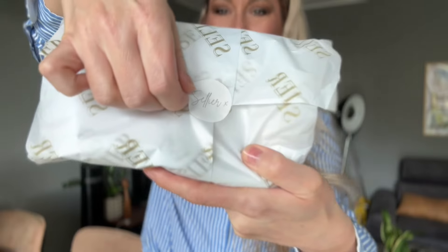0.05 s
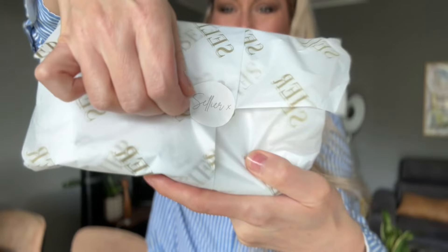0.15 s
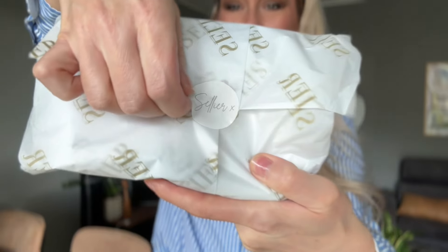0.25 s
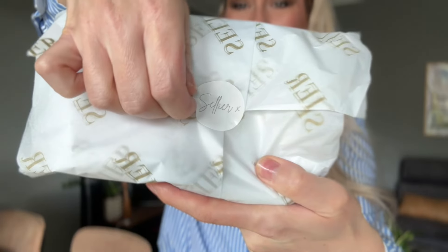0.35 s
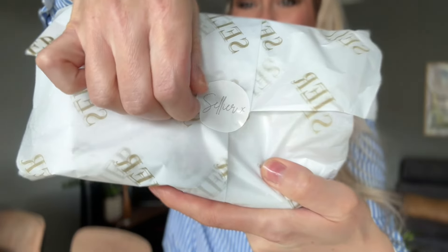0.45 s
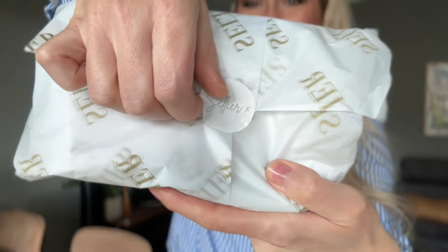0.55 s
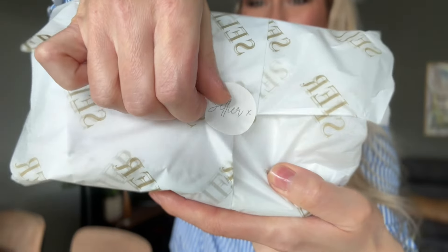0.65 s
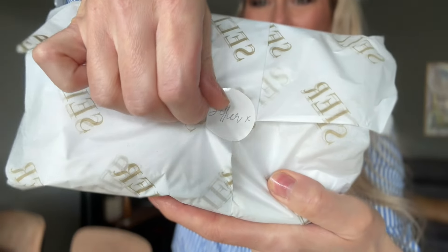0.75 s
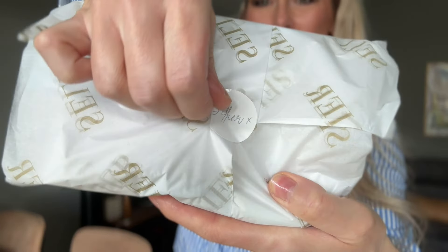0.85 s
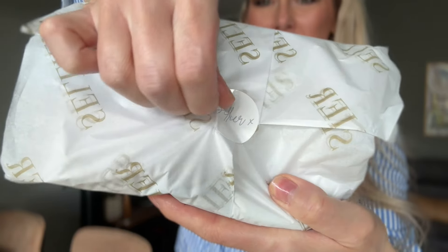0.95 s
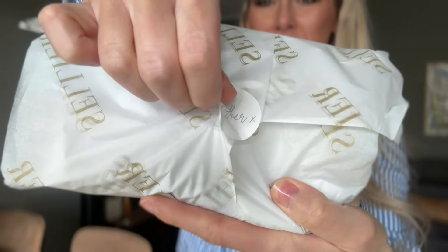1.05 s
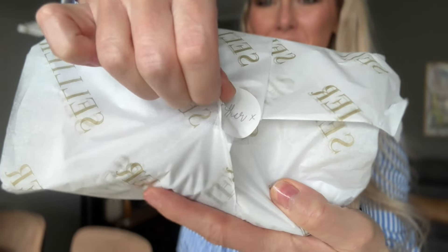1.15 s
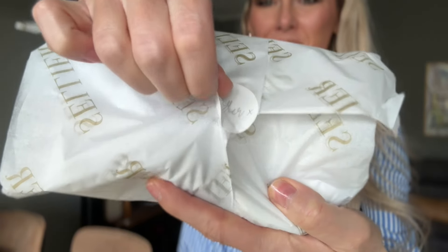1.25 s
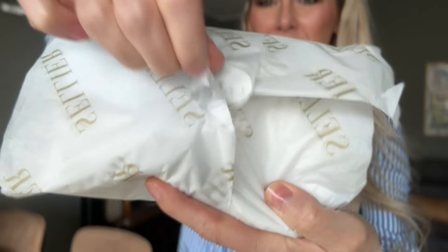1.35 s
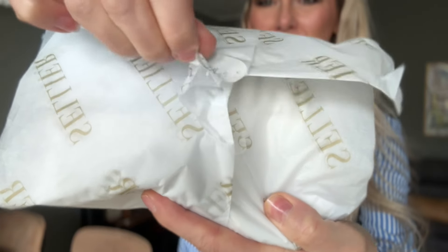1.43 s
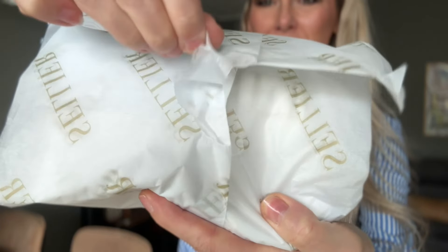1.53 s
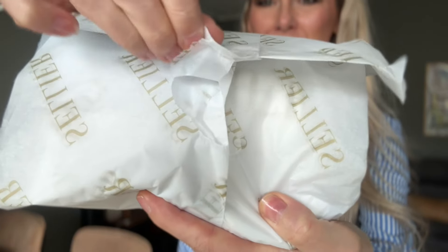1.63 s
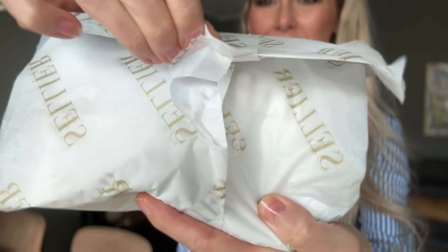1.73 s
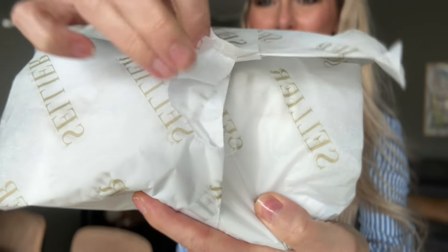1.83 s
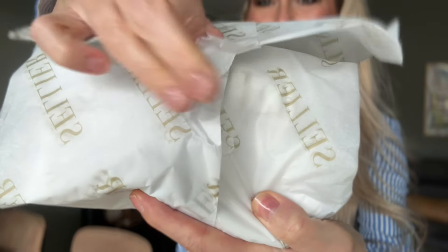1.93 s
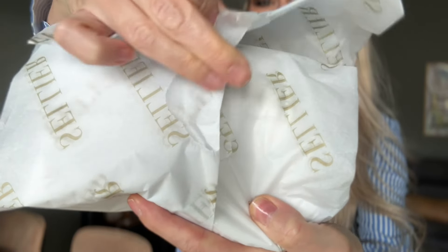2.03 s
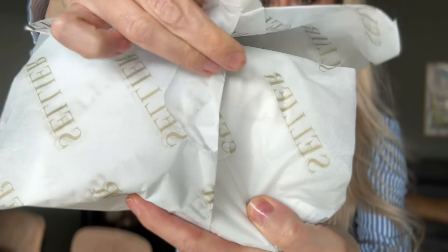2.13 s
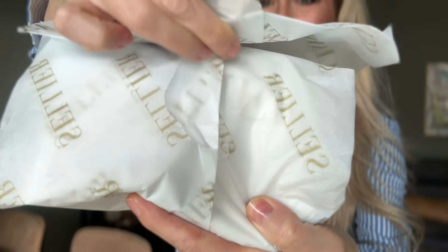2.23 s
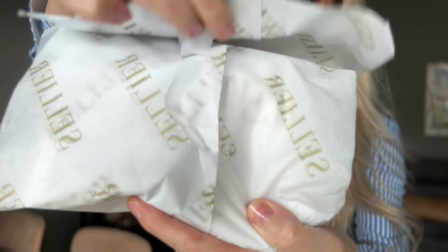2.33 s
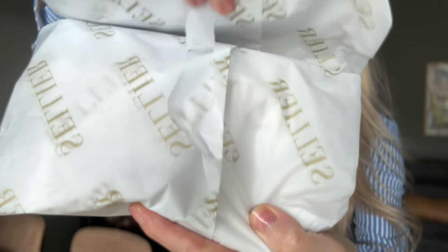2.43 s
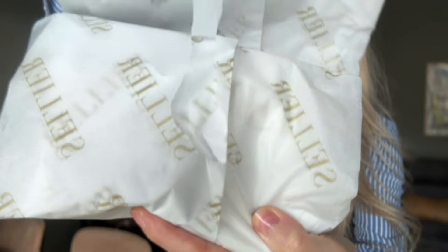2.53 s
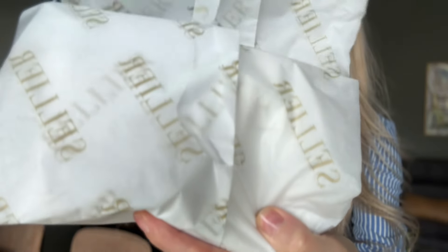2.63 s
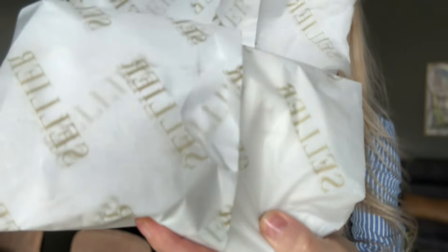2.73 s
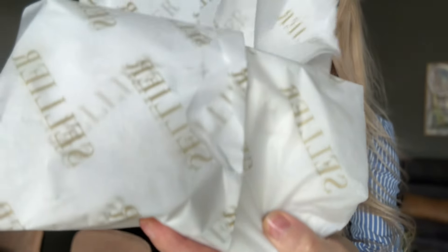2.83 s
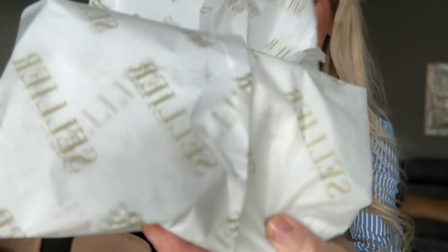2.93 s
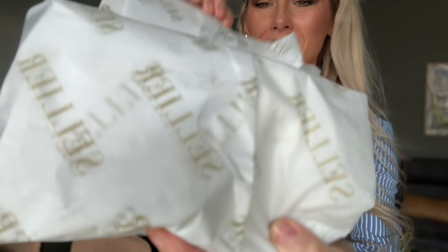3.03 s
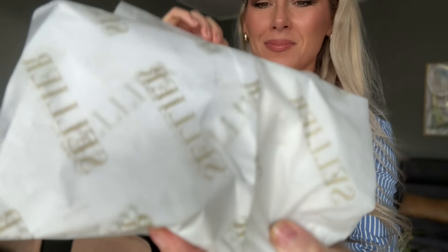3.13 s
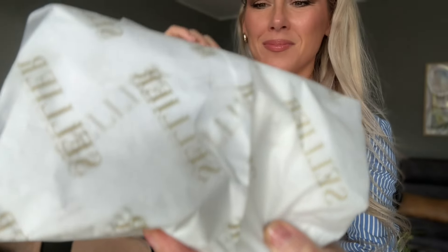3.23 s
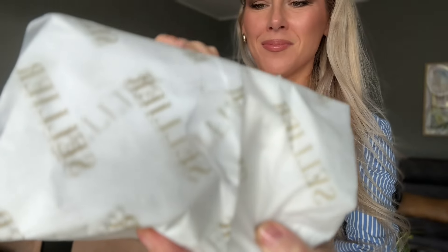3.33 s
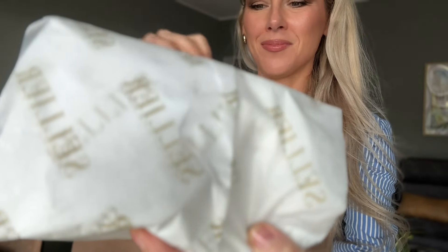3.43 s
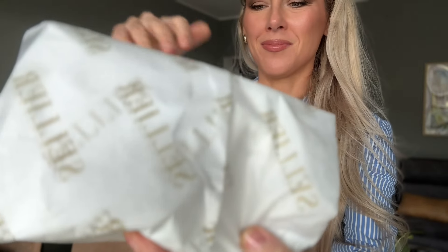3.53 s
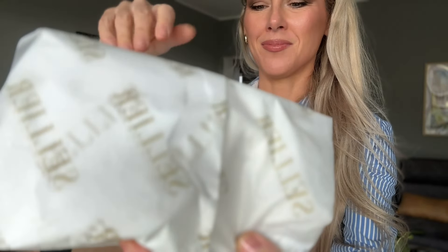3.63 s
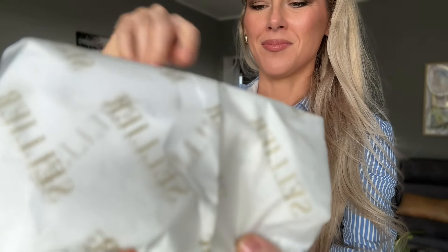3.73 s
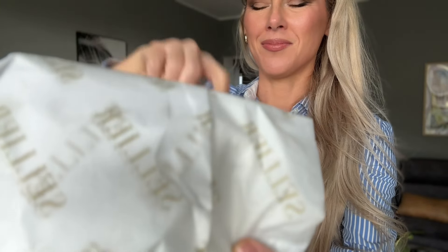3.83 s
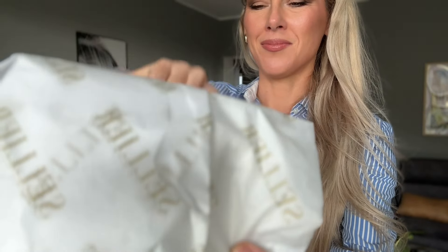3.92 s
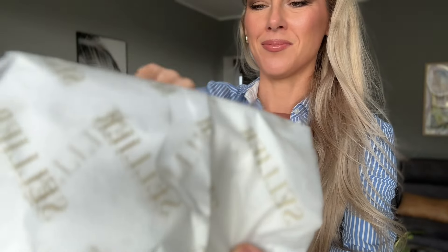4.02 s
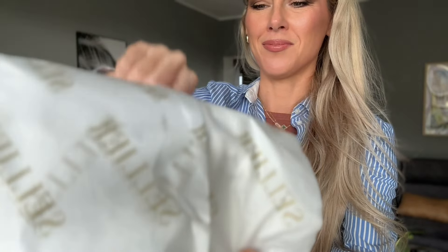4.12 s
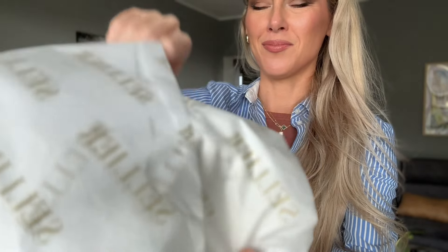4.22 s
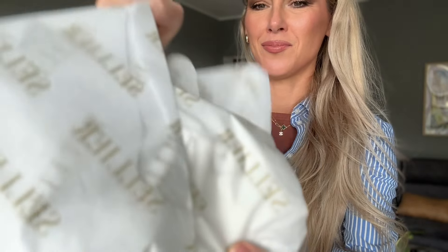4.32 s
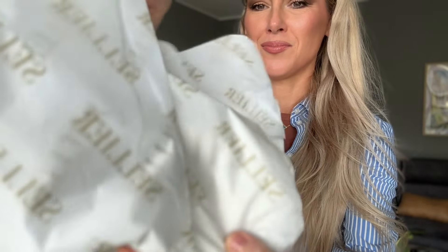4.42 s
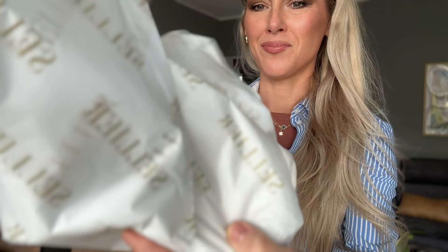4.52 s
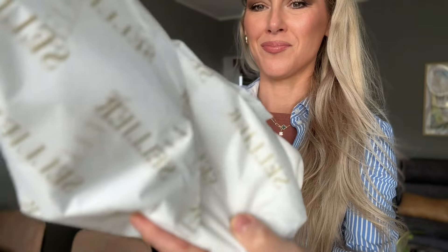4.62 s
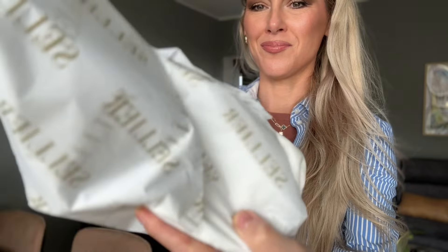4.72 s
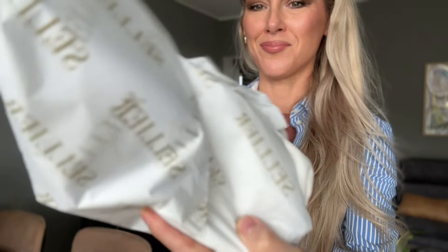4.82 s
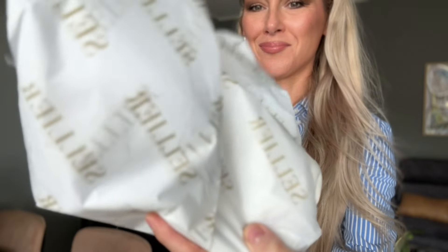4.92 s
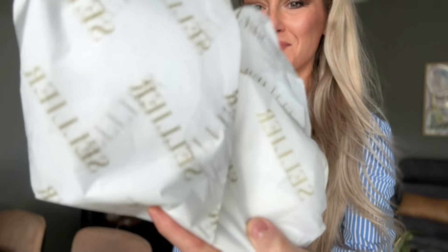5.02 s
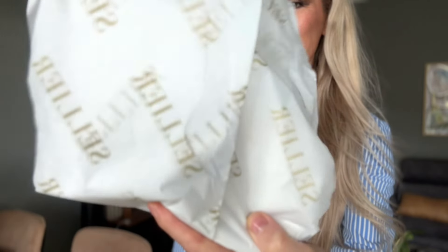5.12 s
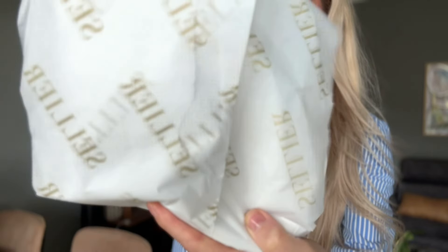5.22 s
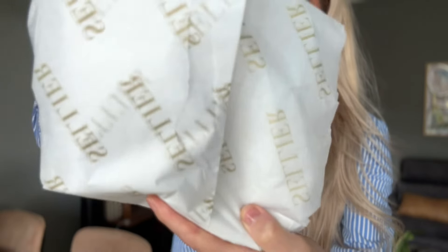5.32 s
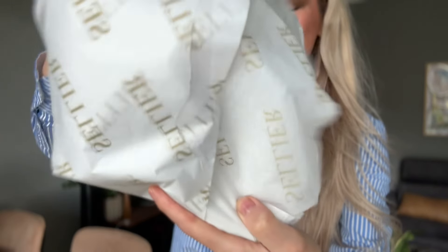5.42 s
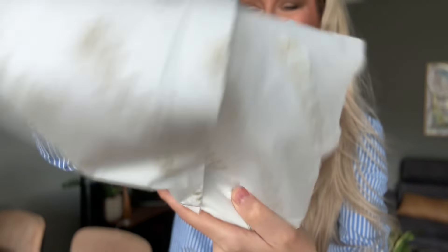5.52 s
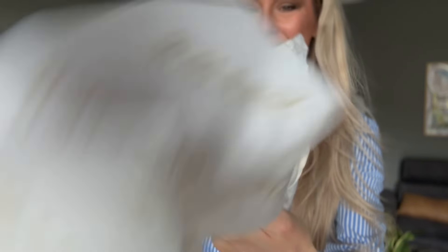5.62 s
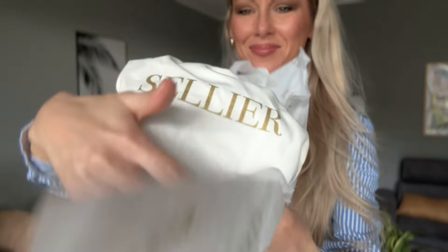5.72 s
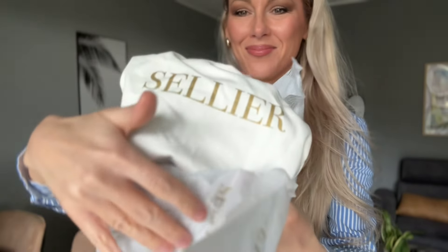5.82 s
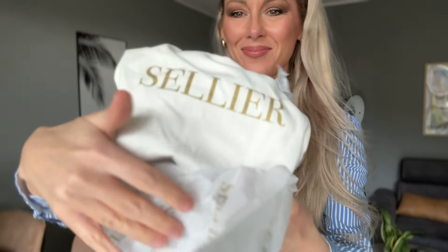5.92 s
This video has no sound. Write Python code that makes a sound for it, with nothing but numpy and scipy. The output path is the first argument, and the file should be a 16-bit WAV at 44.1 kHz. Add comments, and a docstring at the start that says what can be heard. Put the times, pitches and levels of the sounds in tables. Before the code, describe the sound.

A parcel in thin tissue paper is unwrapped by hand, very close to a stereo microphone in a quiet furnished room. Near silence with tiny ticks, then hollow finger slips on taut paper, loud snapping crackle as the sticker releases, bright rustling folds, a brief lull, and softer sliding swishes with a few crisp snaps.

```python
"""A living room: a parcel in thin tissue paper is unwrapped by hand, close to a pair of microphone ports.
The paper is pulled taut, a sticker comes away, then the folds are lifted and slide over each other.
Every buckle of a crease is a burst of noise: a crisp tick, a shake of the sheet around it, a little air.
The taut sheet also sounds hollow under slipping fingers; a short room tail and a faint floor lie behind."""
import sys
import numpy as np
from scipy import signal
from scipy.fft import rfft, irfft, next_fast_len
from scipy.io import wavfile

SR = 44100
rng = np.random.default_rng(int(sys.argv[2]) if len(sys.argv) > 2 else 0)


def transcribe(signal):
    """Save signal, clipped to [-1, 1], as a 16-bit WAV file at the path in sys.argv[1]."""
    frames = np.atleast_2d(signal).T
    limited = np.clip(frames, -1, 1)
    pcm = np.round(limited * 32767).astype(np.int16)
    wavfile.write(sys.argv[1], SR, pcm)


N = 262880

# Levels in the tables are drives or relative gains, ahead of any later trim.
# Pull on the sheet before the sticker gives: (time [s], tautness [0-1])
PULL = [(.45, 0), (.53, 0.58), (.76, 0.85), (.89, 0.66), (.96, 0.07), (1.45, 0.05)]
# Pressure of the hands on the parcel: (time [s], rustle [dB], sheet above the rustle [dB])
GRIP = [(0, -56, -40), (.29, -53, -25), (.5, -47.5, -30), (.53, -35, -13), (.66, -34.5, -8),
        (.89, -34.5, -8), (1.2, -28.5, -2), (1.44, -28, -10), (1.63, -39.5, -8), (1.91, -43, -4),
        (2.08, -28, -4.5), (3.27, -47, 1.5), (3.65, -45, -2.5), (3.9, -52.5, -2.5), (4.08, -36, -0.5),
        (5.02, -33, -4.5), (5.3, -49.5, -0.5), (5.96, -31, -3.5)]
# A fold is pulled or slid: (start [s], length [s], first level [dB], last level [dB],
# crackle against smooth sliding [0-1], brightness [dB], sheet [dB], air [dB])
STROKES = [(0.317, 0.054, -49, -42, 0.1, -2, -27, -40), (0.708, 0.03, -31, -31, 0.8, -2, -4, -45),
           (0.911, 0.02, -30, -31.5, 0.6, 1.5, 1.5, -26), (0.966, 0.087, -15, -31, 0.64, -10, -1, -16.5),
           (1.17, 0.019, -20, -25.5, 1, -0.5, -4, -22), (1.258, 0.115, -12, -12.5, 0.68, 1.5, -6, -22.5),
           (1.455, 0.11, -22.5, -17, 0.85, 5, -7, -21), (1.739, 0.16, -34, -38, 0.9, 2, -6.5, -19),
           (1.946, 0.099, -16, -18, 0.14, 1.5, -8.5, -19), (2.027, 0.027, -47, -35, 0.46, 4, -10, 1),
           (2.152, 0.06, -26, -21.5, 0.75, 3.5, -8.5, -12), (2.262, 0.012, -19, -21.5, 0.6, 2, -10.5, -18),
           (2.3, 0.271, -21.5, -16.5, 0.58, 5, -6, -18), (2.578, 0.17, -21, -23.5, 0.55, 0, -2.5, -12.5),
           (2.775, 0.155, -26.5, -22.5, 0.6, 0.5, 1.5, -7), (2.937, 0.15, -24, -32, 0.35, 0, 1.5, -7),
           (3.081, .12, -37.5, -43.5, 0.9, -12, 5.5, 7), (3.41, 0.05, -53, -39.5, 0.1, -8, 2.5, -7.5),
           (3.563, 0.065, -46, -48.5, 0.1, -14, -2, -1.5), (3.923, 0.11, -45.5, -34, 0.7, -4.5, -1, -10),
           (4.121, .285, -33.5, -25, 0.5, -0.5, -5.5, -19), (4.428, 0.128, -26.5, -23.5, 0.4, -2, -3, -25),
           (4.575, 0.12, -28.5, -26, 0.55, -0.5, -3.5, -21),
           (4.658, 0.095, -20.5, -26.5, 0, -4.5, -4.5, -23), (4.783, 0.12, -31, -29, 0.53, -3.5, -4.5, -33),
           (5.01, 0.052, -40, -22.5, 0.24, -1, -5, -27), (5.09, 0.14, -29.5, -33.5, 0.2, -4, -5, -22.5),
           (5.361, 0.27, -24.5, -22.5, 0.14, -3, -3, -16.5), (5.604, 0.057, -27, -22.5, 0.2, -5, -1, -14),
           (5.673, 0.25, -26, -36.5, 0.65, -4.5, -2, -14.5)]
# Larger creases that snap through: (time [s], level [dB])
SNAPS = [(0.0785, -26), (0.1638, -28), (0.2314, -26), (0.2446, -30), (0.3314, -24), (0.3426, -20),
         (.4595, -24), (.518, -26), (.5325, -21), (0.5405, -14), (0.5945, -20), (0.6345, -10),
         (0.7028, -14), (0.7307, -12), (.7715, -15), (0.7865, -10.5), (0.8180, -13), (.847, -16),
         (0.8577, -9.5), (0.9012, -11), (.937, -13), (0.9692, -8), (1.0158, -7), (1.0343, -2), (1.0432, -8),
         (1.0468, -5), (1.0565, -9), (1.1348, -8), (1.1718, -3), (1.2416, -3), (1.2545, -5), (1.2612, -1),
         (1.2788, -1), (1.3177, -1), (1.3648, -1), (1.4444, -9), (1.4541, -2), (1.4735, -7), (1.4834, -6),
         (1.513, -1), (1.5387, -1), (1.6880, -10.5), (1.702, -19), (1.7455, -3), (1.7538, -4), (1.7614, -2),
         (1.7682, -1), (1.7972, -5), (1.809, -13), (1.8815, -13), (1.8905, -16), (1.9355, -6), (1.939, -8),
         (1.9495, -3), (1.9703, -4), (2.0217, -3), (2.123, -13), (2.1608, -4), (2.2064, -8), (2.2706, -11),
         (2.2987, -5), (2.317, -6), (2.533, -3), (2.573, -4), (2.638, -7), (3.6262, -24), (3.7274, -28),
         (3.9779, -21), (4.0193, -18), (4.2298, -8), (4.9826, -15), (5.2070, -10)]
# Whole panels that flip over: (middle [s], length [s], level [dB])
FLOPS = [(.985, .03, -21), (1.335, .05, -21), (2.95, .15, -29), (4.543, .06, -26), (4.742, .09, -23.5)]
# Fingers slip on the taut sheet: (middle [s], length [s], level [dB])
RUBS = [(.545, .035, -51), (.595, .035, -51), (.63, .05, -41.5), (.735, .075, -38), (.815, .07, -46),
        (.872, .045, -45), (.92, .045, -39)]
# Colour of the ticks: (frequency [Hz], relative density [dB per Hz])
CRISP = [(2350, -39.5), (3150, -18), (3650, 0), (4800, 2.16), (6300, 1.5), (8000, 0.5), (9200, 1),
         (11200, -2.5), (14000, 2.5), (15800, -7)]
# Pitch that the moving fold favours: (time [s], frequency [Hz])
FOLD_PITCH = [(1.3, 8800), (1.78, 8800), (2.0, 10800), (2.65, 11400), (2.85, 8800), (3.0, 10000),
              (4.7, 8240)]
# Colour of the slack sheet: (frequency [Hz], relative density [dB per Hz])
SHEET = [(130, -20.5), (250, 0.5), (340, 3), (440, -1), (550, 2), (720, 0.5), (870, 0.5), (1300, -1),
         (1900, -1.5), (2700, -1), (3250, 0), (4300, -11.5)]
# Hollowness of the sheet, high while a lifted fold is cupped, low once it lies open: (time [s], level [dB])
CUP = [(.93, 2), (1.02, -2), (1.33, 4.5), (1.75, 1.5), (2.05, 2), (2.45, 0.5), (2.65, 1), (2.85, 4),
       (3.02, 2), (3.3, -1.5), (3.7, -1), (4.2, 0.5), (5.0, -1), (5.5, -1)]
# How the bands follow that hollowness: (frequency [Hz], slope [dB per dB])
CUP_COLOUR = [(350, 0), (600, 0.46), (1000, 0.93), (1700, 0.5), (2300, -0.5), (3100, -2.5)]
# Lowest pitch of the dry crackle, sinking as the taut patch widens: (time [s], frequency [Hz])
REACH = [(.53, 3600), (.62, 2200), (.72, 1500)]
# Drum-like resonances of the taut sheet: (frequency [Hz], half width [Hz], relative level [dB])
TAUT_MODES = [(292, 20, -13), (545, 28, 6), (675, 22, -1), (830, 32, 3.5), (1060, 24, -13)]
# Colour of the pushed air: (frequency [Hz], relative density [dB per Hz])
AIR = [(20, -56), (45, -11), (70, 0.5), (120, 0.5), (210, -3), (350, -19.5)]
# Gain of the deep bass in the puffs of air: (time [s], level [dB])
BILLOW = [(0, -3), (.97, -35), (1.2, -1.5), (2.1, 4.5), (2.85, -8.5), (3.2, 2), (3.8, -11), (4.7, 11),
          (5.45, 5), (5.96, -11)]
# The two microphone ports: (frequency [Hz], coherence [0-1], phase lead of the left [rad],
# left minus right [dB])
PORTS = [(60, .68, .1, -4.5), (130, .66, 0, -6.5), (400, .62, -.1, -4.8), (1300, .78, -.35, -2.3),
         (2100, .58, -1.0, -.8), (2900, .4, -2.3, -1.2), (3800, .33, -2.7, -1.2), (4800, .52, -3.2, -1.6),
         (6200, .33, -2.3, -.8), (7400, .62, -1.3, 0), (8600, .97, 0, 0), (9300, .995, 0, 0),
         (11300, .995, 0, 0), (12200, .65, 1.1, 0), (13800, .7, 2.2, 0), (14700, .98, 3.1, 0)]

# Grip and strokes
GRIP_CRACKLE, GRIP_BRIGHT_DB = 0.8, -2
GRIP_AIR_DB, TAUT_AIR_DB = -14.5, -11.5  # air against the sheet; a taut sheet pushes less
ATTACK_S, RELEASE_DB_PER_S = 0.0072, 312
# Fine crackle of tiny buckles, and the finer grain of sliding fibres
BUCKLES_PER_S, FIBRE_CATCHES_PER_S = 650, 6000  # typical rates, varied by the clumping
BUCKLE_CLUMP_DB, BUCKLE_SPREAD_DB, BUCKLE_DECAY_S = 1, 4.0, .00036
SNAP_DB, SNAP_DECAY_S = -1.5, .00039
# Small random snaps under the grip, more often while the sheet is taut (rates add)
STRAYS_PER_S, TAUT_STRAYS_PER_S, STRAY_DB, STRAY_SPREAD_DB = 1, 35, 11, 2.5
FOLD_PEAK_DB, FOLD_OCTAVES = 3.5, .3
TICK_RING_SHARE, TICK_RING_S = .07, .0013  # share of a tick's energy that rings on
# Place and microphone
ROOM_T60_S, ROOM_DB, FLOOR_DB = 0.12, -8, -75
CUTOFF_HZ = 15800

# Sample times, and the frequencies of the padded transform
TIME = np.arange(N) / SR
SIZE = 2 * next_fast_len(N // 2 + SR // 2)
HZ = np.maximum(np.arange(SIZE // 2 + 1) * SR / SIZE, 1)


def hands():
    """Grip and strokes add up; each counts by its power in crackle, brightness and shares of sheet and air."""
    grip_db, grip_sheet_db = in_time(GRIP)
    taut = tautness()
    grip = from_db(grip_db) ** 2
    grip_air_db = grip_sheet_db + GRIP_AIR_DB + TAUT_AIR_DB * taut
    parts = [(grip, GRIP_CRACKLE, GRIP_BRIGHT_DB, grip_sheet_db, grip_air_db)]
    for start, length, first_db, last_db, *feel in STROKES:
        parts.append((stroke(start, length, first_db, last_db), *feel))
    rustle = crackly = bright = to_sheet = to_air = 0
    for power, share, bright_db, sheet_db, air_db in parts:
        rustle = rustle + power
        crackly = crackly + power * np.clip(share, 0, 1)
        bright = bright + power * bright_db
        to_sheet = to_sheet + power * from_db(sheet_db) ** 2
        to_air = to_air + power * from_db(air_db) ** 2
    sliding = rustle - crackly + grip * strays(taut)
    return sliding, crackly, bright / rustle, to_sheet / rustle, to_air / rustle


def tautness():
    """Pull on the sheet at every sample, from slack (0) to fully taut (1)."""
    return np.clip(in_time(PULL)[0], 0, 1)


def stroke(start, length, first_db, last_db):
    """Power of one movement: it starts quickly, swells or eases as the hand goes on, then dies away."""
    age = TIME - start
    course_db = np.interp(age, [0, length], [first_db, last_db])
    level_db = course_db - RELEASE_DB_PER_S * np.clip(age - length, 0, 1)
    return (np.clip(age / ATTACK_S, 0, 1) * from_db(level_db)) ** 2


def strays(taut):
    """Energy of the small random snaps, against the rustle of the grip."""
    born = rng.random(N) < (STRAYS_PER_S + TAUT_STRAYS_PER_S * taut) / SR
    energy = born * from_db(STRAY_DB + STRAY_SPREAD_DB * rng.standard_normal(N)) ** 2
    return linger(energy, SNAP_DECAY_S) * SNAP_DECAY_S * SR


def crackle(per_s, spread_db, clump_db, decay_s):
    """Tiny buckles come in avalanches, many small and few large; mean power one."""
    born = rng.random(N) < per_s * from_db(clump_db * drift(90)) / SR
    size = np.minimum(rng.exponential(1, N), 2)
    energy = born * from_db(spread_db * size) ** 2
    return linger(energy / (energy.mean() + 1e-12), decay_s)


def bursts(events, decay_s):
    """Paper gives way at once, then its energy dies away."""
    power = np.zeros(N)
    for s, level_db in events:
        power[int(s * SR)] += from_db(level_db) ** 2
    return linger(power, decay_s) * decay_s * SR


def swells(events):
    """Power of soft movements that rise and fall in one rounded arch."""
    power = 0
    for middle, length, level_db in events:
        arch = np.cos(np.pi * np.clip((TIME - middle) / length, -.5, .5))
        power = power + (from_db(level_db) * arch) ** 2
    return power


def ticks(power, bright_db, patchy_db=2.0, level_db=-1.51):
    """Creases favour shifting pitches, around a peak that moves as the fold tightens and opens."""
    power = (1 - TICK_RING_SHARE) * power + TICK_RING_SHARE * linger(power, TICK_RING_S)
    plain = radiate(power, from_db(in_frequency(CRISP)[0]))
    centres = np.geomspace(3300, 14000, num=9)
    tilts = np.interp(centres, [5500, 8500], [-.7, .3])  # brightness dims the low bands, lifts the high
    peak_hz = in_time(FOLD_PITCH)[0]
    levels_db = []
    for hz, tilt in zip(centres, tilts):
        octaves_off = np.log2(hz / peak_hz)
        peak_db = FOLD_PEAK_DB * np.exp(-(octaves_off / FOLD_OCTAVES) ** 2)
        levels_db.append(tilt * bright_db + peak_db)
    return from_db(level_db) * shifting(plain, centres, 250, patchy_db, levels_db)


def sheet(power, bright_db, ring_s=0.0028, patchy_db=1.5, flutter_db=1.0, slack_db=-0.81,
          edge_db_per_octave=30):
    """The surrounding paper answers broadly when slack, hollower when cupped, thin and dry when taut."""
    taut, cup_db, lowest_hz = tautness(), in_time(CUP)[0], in_time(REACH)[0]
    power = power * from_db(flutter_db * drift(150)) ** 2  # some creases shake the sheet more than others
    shaken = linger(power, ring_s) * (1 - taut) + power * taut  # only slack paper rings on
    plain = radiate(shaken, from_db(in_frequency(SHEET)[0]))
    centres = np.geomspace(250, 3300, num=22)
    levels_db = []
    for hz in centres:
        tilt_db = np.interp(hz, [1200, 2500], [-.3, .6]) * bright_db
        hollow_db = np.interp(hz, *np.transpose(CUP_COLOUR)) * cup_db
        octaves_below = np.maximum(np.log2(lowest_hz / hz), 0)
        levels_db.append(tilt_db + hollow_db - taut * edge_db_per_octave * octaves_below)
    return from_db(slack_db) * shifting(plain, centres, 35, patchy_db, levels_db)


def shifting(spectrum, centres, rate, spread_db, levels_db):
    """As the paper deforms its resonances come and go: each band swells by itself about its given level."""
    out = 0
    for own, level_db in zip(np.eye(len(centres)), levels_db):
        band = irfft(spectrum * np.interp(HZ, centres, own))[:, :N]
        out = out + band * from_db(spread_db * drift(rate) + level_db)
    return rfft(out, SIZE)


def drum(wander_s=0.00052):
    """Under each slip of the fingers the taut sheet answers hollow, its pitch wavering slightly at random."""
    warped = TIME + wander_s * drift(8.03)
    sides = irfft(radiate(swells(RUBS), resonances(TAUT_MODES)))[:, :N]
    return rfft([np.interp(warped, TIME, side) for side in sides], SIZE)


def resonances(modes):
    """Gain of a set of resonances with dark valleys between them."""
    return sum(from_db(db) / (1 + ((HZ - hz) / width) ** 2) for hz, width, db in modes)


def air(power, billow_db, ring_s=0.0098, deep_hz=110, level_db=1.0):
    """Flapping folds push soft puffs of air, deeper when a wide panel billows."""
    puffs = from_db(level_db) * radiate(linger(power, ring_s), from_db(in_frequency(AIR)[0]))
    deep = puffs / (1 + (HZ / deep_hz) ** 4)
    billowing = rfft(irfft(deep)[:, :N] * from_db(billow_db), SIZE)
    return puffs - deep + billowing


def room(pair, dull_hz=4000, thin_hz=220):
    """A short furnished-room tail of decaying noise, weaker in the treble and the deep bass."""
    age = TIME[:SR // 2]
    tail = rng.standard_normal((2, len(age))) * from_db(-60 * age / ROOM_T60_S) * (age > .004)
    tail /= np.sqrt(np.sum(tail ** 2, axis=1, keepdims=True))
    damping = np.sqrt(1 + (HZ / dull_hz) ** 2 + (thin_hz / HZ) ** 2)
    return pair * rfft(tail, SIZE) * from_db(ROOM_DB) / damping


def noise_floor():
    """A faint steady noise, falling off above the bass."""
    return from_db(FLOOR_DB) * radiate(np.ones(N), 1 / (HZ + 200))


def ports(pair):
    """The two ports hear the sound with a likeness, phase and balance that depend on pitch."""
    alike, lead, balance_db = in_frequency(PORTS)
    alike, sides = np.clip(alike, 0, 1), np.array([[1], [-1]])  # left, right
    shared = np.sqrt((1 + alike) / 2) * pair[0]
    opposed = sides * np.sqrt((1 - alike) / 2) * pair[1]
    gains = from_db(sides * balance_db / 2)
    gains = gains / np.sqrt(np.mean(gains ** 2, axis=0))  # balance leaves the total power alone
    return (shared + opposed) * np.exp(.5j * sides * lead) * gains


def from_db(db):
    """Decibels to gain."""
    return 10 ** (np.asarray(db) / 20)


def in_time(rows):
    """Each column of a curve at every sample."""
    s, *columns = np.transpose(rows)
    return [np.interp(TIME, s, c) for c in columns]


def in_frequency(rows):
    """Each column of a spectrum at every frequency, straight over log frequency."""
    hz, *columns = np.transpose(rows)
    return [np.interp(np.log(HZ), np.log(hz), c) for c in columns]


def causal(gain):
    """Minimum-phase filter of this shape that keeps the power of white noise."""
    cepstrum = irfft(np.log(gain / np.sqrt(np.mean(gain ** 2)) + 1e-6))
    cepstrum[1:SIZE // 2] *= 2  # fold the backward half onto the forward half
    cepstrum[SIZE // 2 + 1:] = 0
    return np.exp(rfft(cepstrum))


def linger(power, decay_s):
    """Spreads each pulse of energy into an exponential tail."""
    r = np.exp(-1 / (decay_s * SR))
    return signal.lfilter([1 - r], [1, -r], power + 1e-18)


def drift(rate):
    """Slow chance with a spread of about one and this many fresh values a second."""
    slow = signal.resample_poly(rng.standard_normal(N // 100), 100, 1)
    return np.interp(np.arange(N) * rate * 100 / SR, np.arange(len(slow)), slow)


def radiate(power, gain):
    """Spectra of two unrelated vibrations that share one flow of energy and one colour."""
    return rfft(np.sqrt(power) * rng.standard_normal((2, N)), SIZE) * causal(gain)


def scene():
    """Sliding, crackle and snaps feed the ticks, the sheet and the air, heard close up in the room."""
    sliding, crackly, bright_db, to_sheet, to_air = hands()
    fibres = crackle(FIBRE_CATCHES_PER_S, BUCKLE_SPREAD_DB, BUCKLE_CLUMP_DB, BUCKLE_DECAY_S / 2)
    buckles = crackle(BUCKLES_PER_S, BUCKLE_SPREAD_DB, BUCKLE_CLUMP_DB, BUCKLE_DECAY_S)
    snaps = from_db(SNAP_DB) ** 2 * bursts(SNAPS, SNAP_DECAY_S)
    power = sliding * fibres + crackly * buckles + snaps
    flops = swells(FLOPS)
    paper = ticks(power, bright_db) + sheet(power * to_sheet + flops, bright_db) + drum()
    flop_air = flops * from_db(-13.5) ** 2
    paper = paper + air(power * to_air + flop_air, in_time(BILLOW)[0])
    return irfft(ports(paper + room(paper) + noise_floor()))[:, :N]


def record(dry):
    """The highest peaks are clipped at full scale, then the top is cut steeply."""
    low_pass = signal.firwin(301, CUTOFF_HZ, fs=SR)
    return signal.fftconvolve(np.clip(dry, -1, 1), low_pass[None], mode="same", axes=1)


dry = scene()
out = record(dry)
transcribe(out)
```